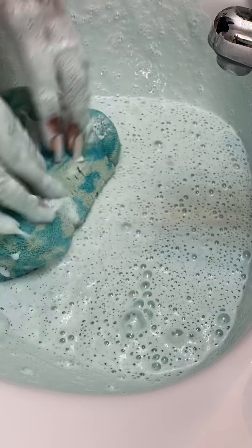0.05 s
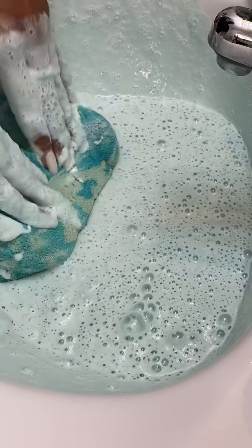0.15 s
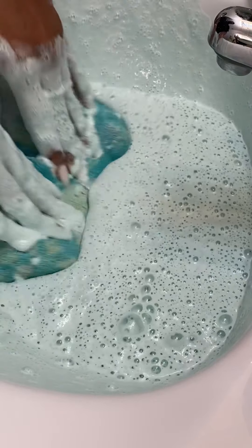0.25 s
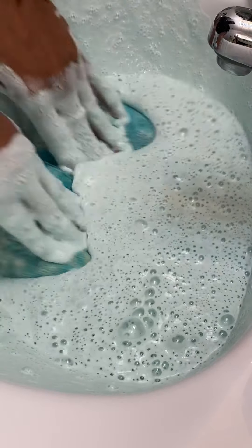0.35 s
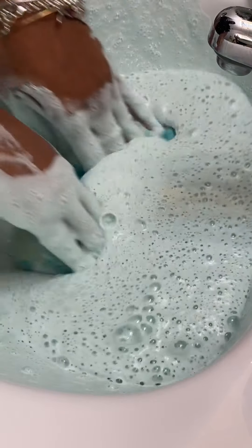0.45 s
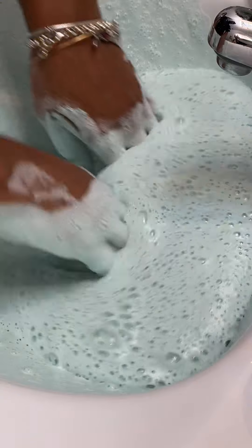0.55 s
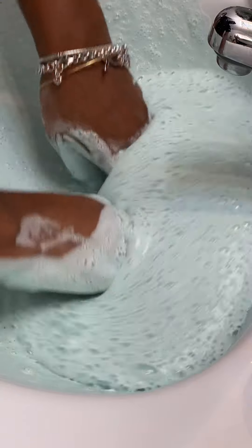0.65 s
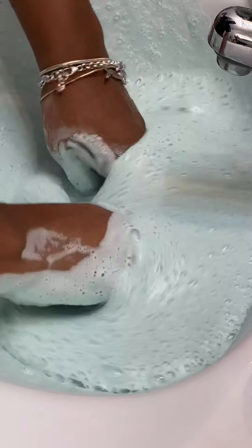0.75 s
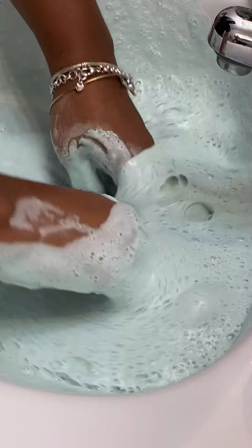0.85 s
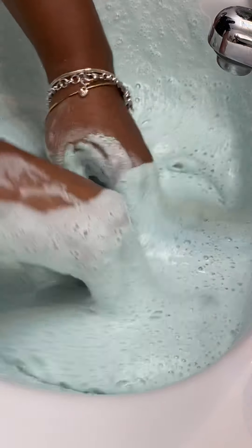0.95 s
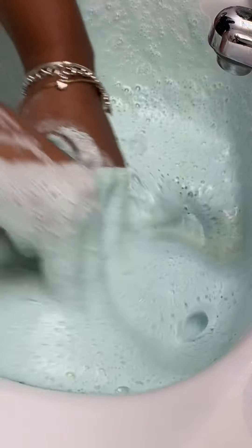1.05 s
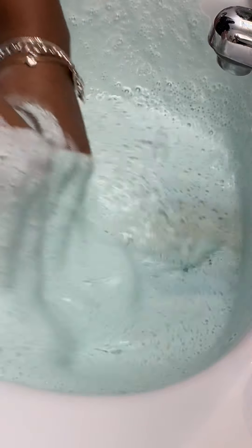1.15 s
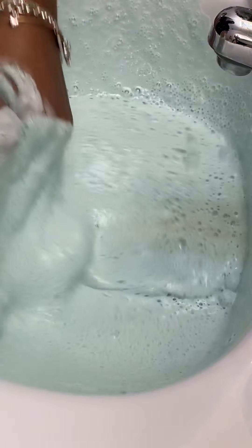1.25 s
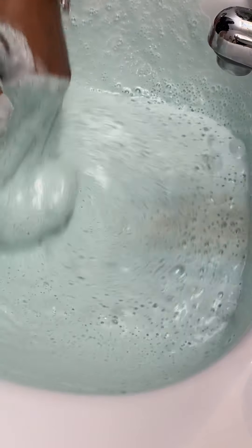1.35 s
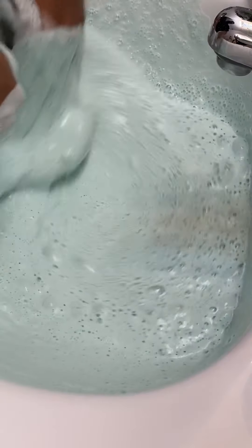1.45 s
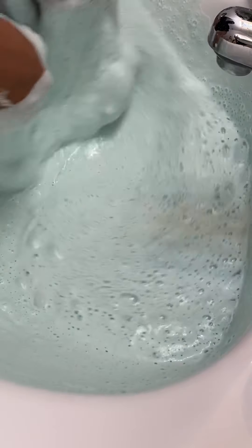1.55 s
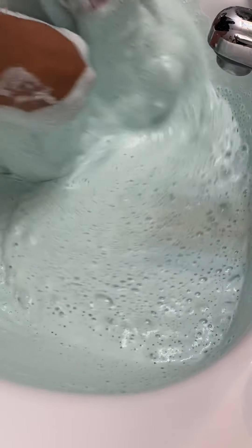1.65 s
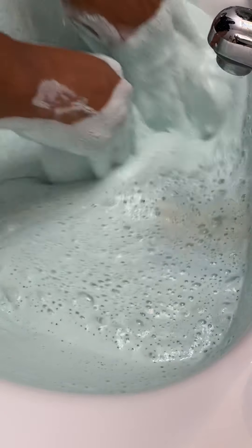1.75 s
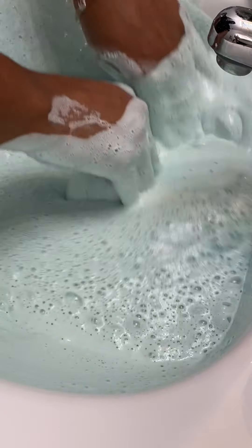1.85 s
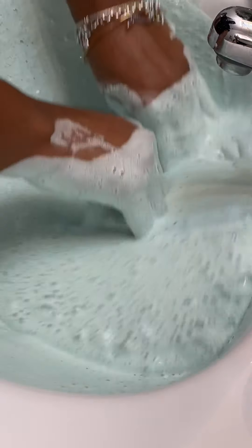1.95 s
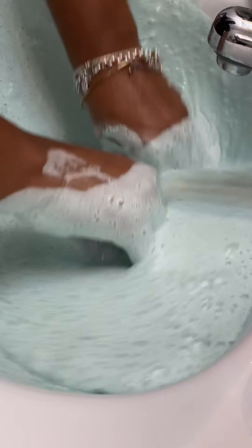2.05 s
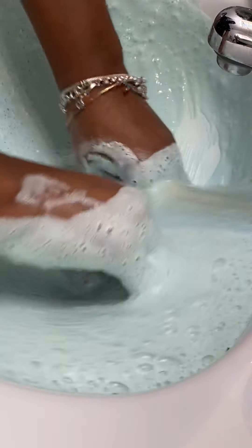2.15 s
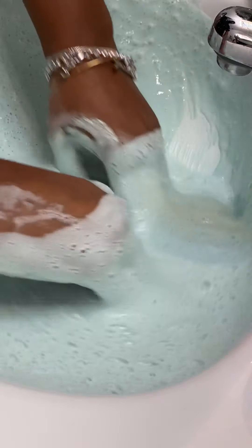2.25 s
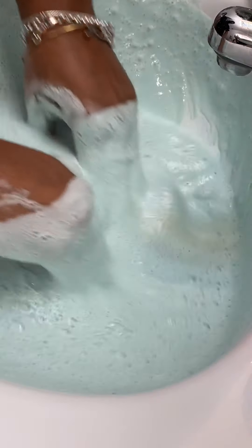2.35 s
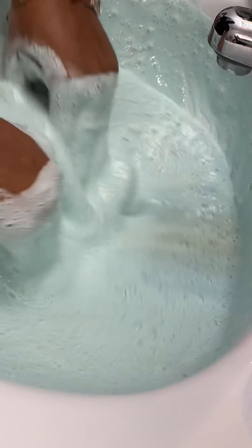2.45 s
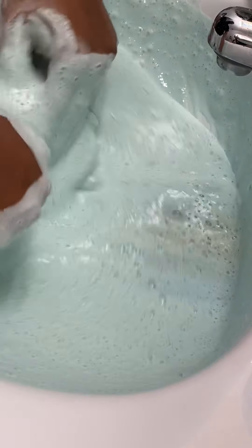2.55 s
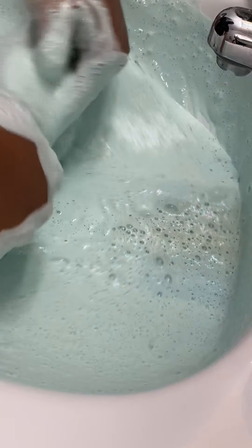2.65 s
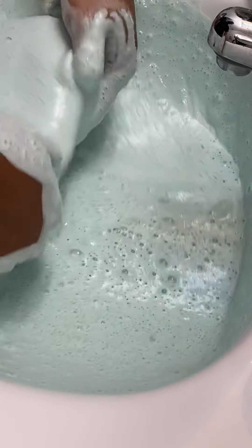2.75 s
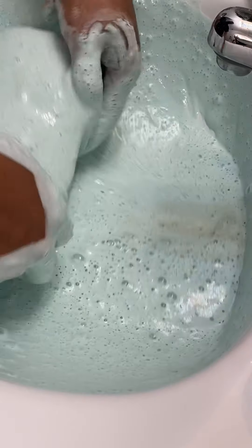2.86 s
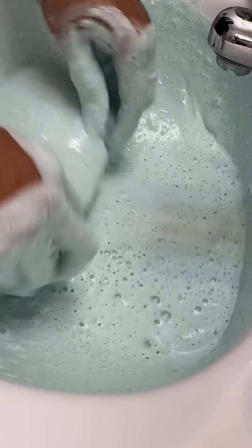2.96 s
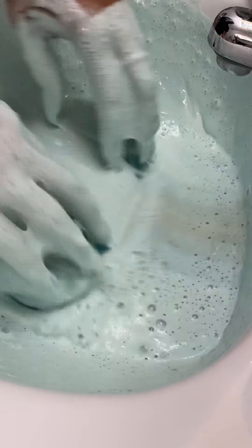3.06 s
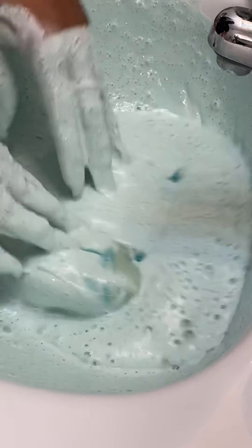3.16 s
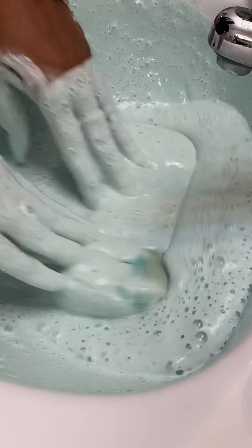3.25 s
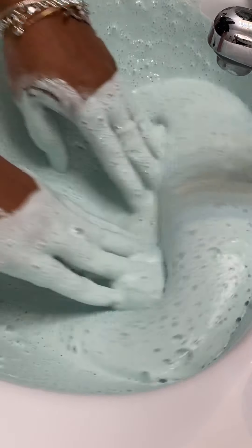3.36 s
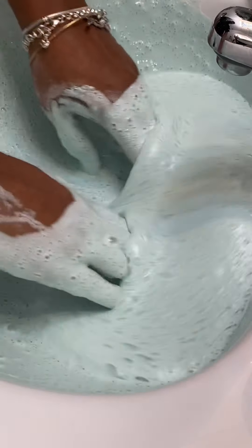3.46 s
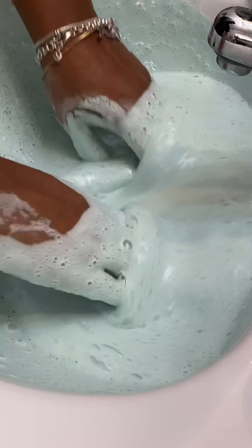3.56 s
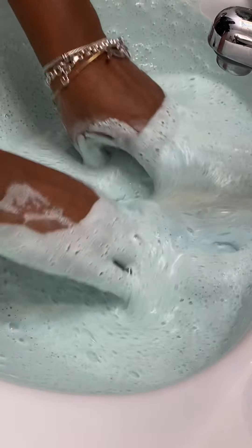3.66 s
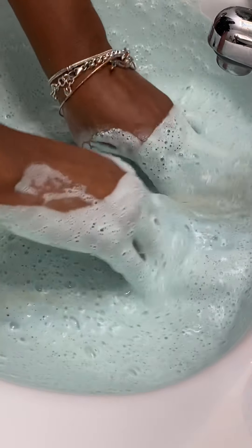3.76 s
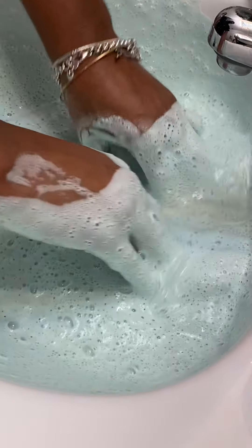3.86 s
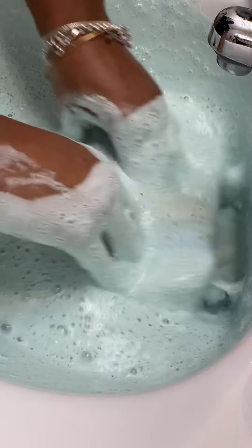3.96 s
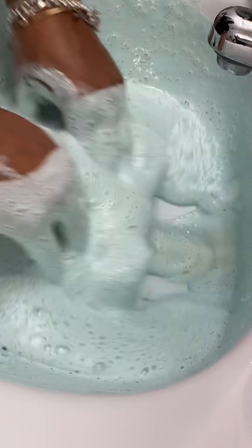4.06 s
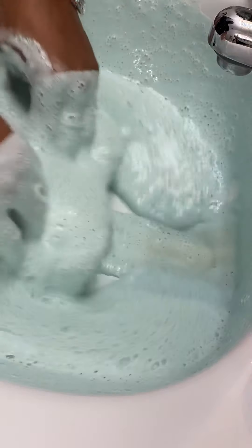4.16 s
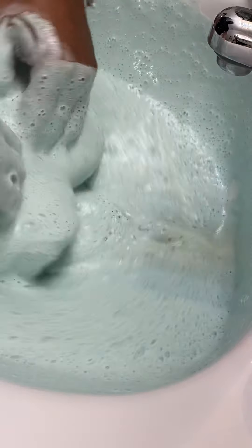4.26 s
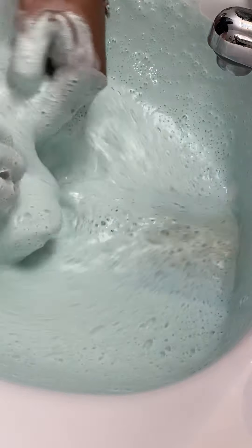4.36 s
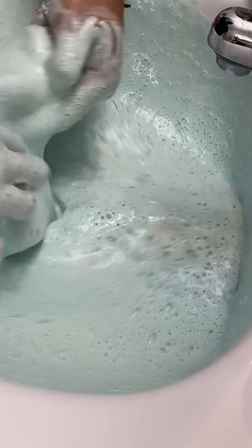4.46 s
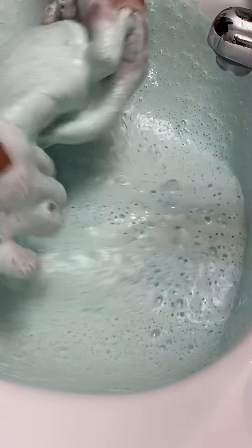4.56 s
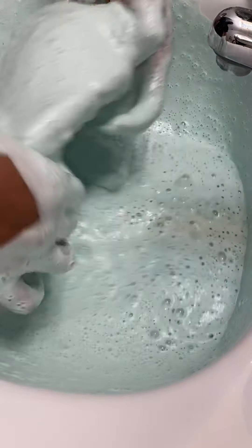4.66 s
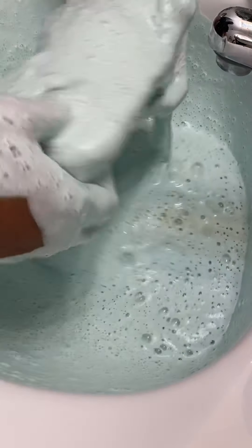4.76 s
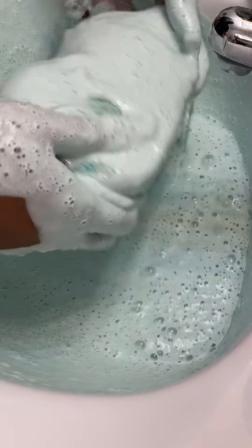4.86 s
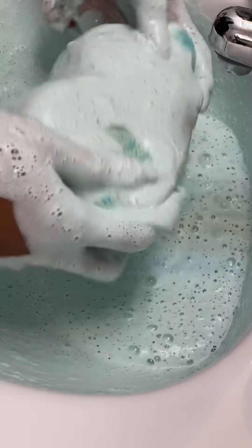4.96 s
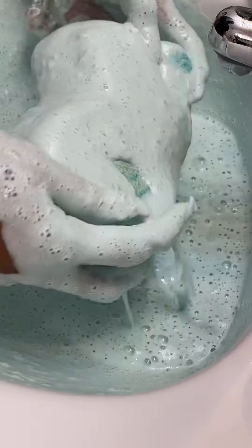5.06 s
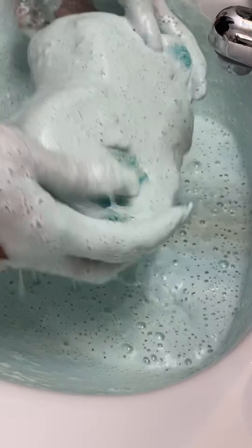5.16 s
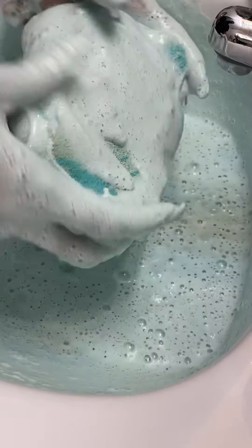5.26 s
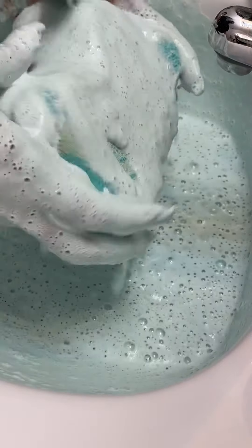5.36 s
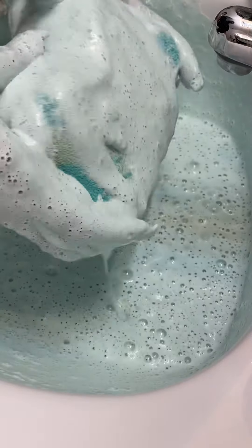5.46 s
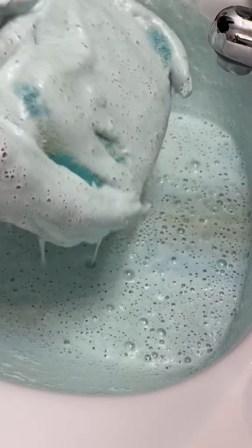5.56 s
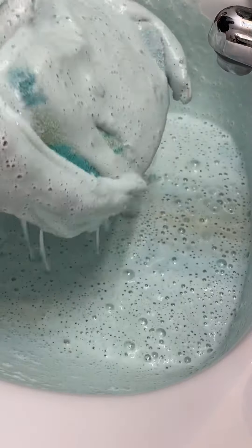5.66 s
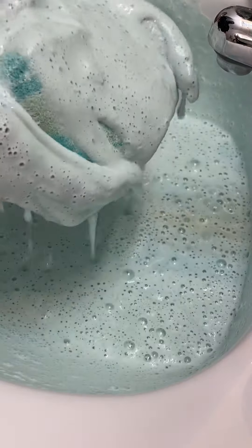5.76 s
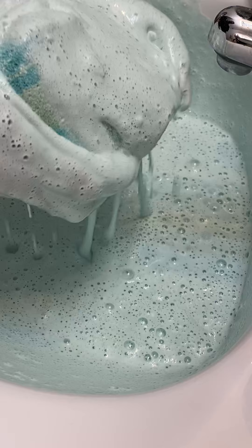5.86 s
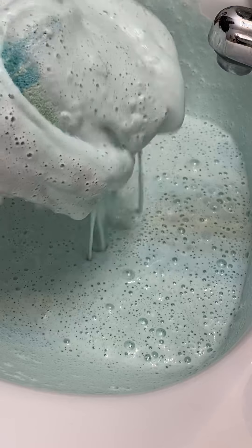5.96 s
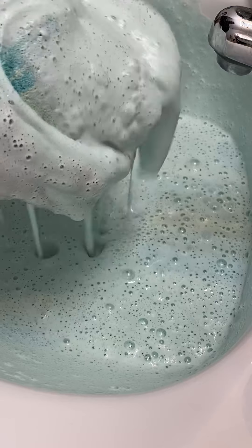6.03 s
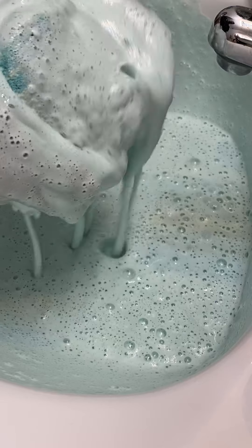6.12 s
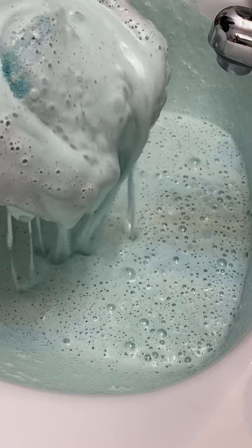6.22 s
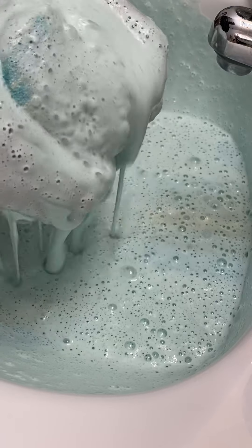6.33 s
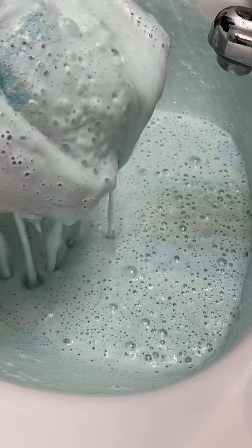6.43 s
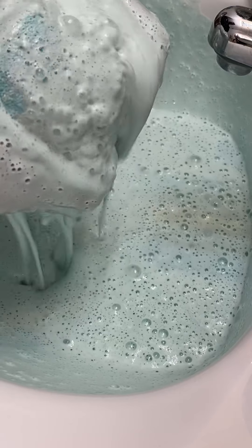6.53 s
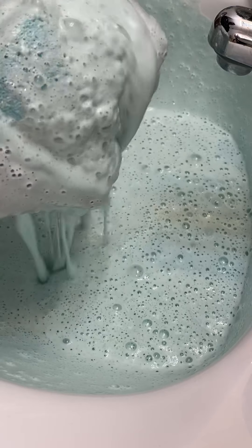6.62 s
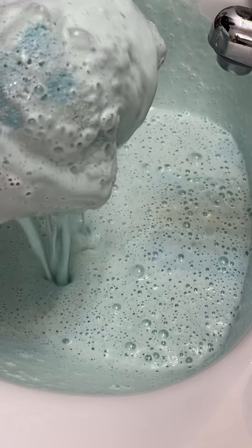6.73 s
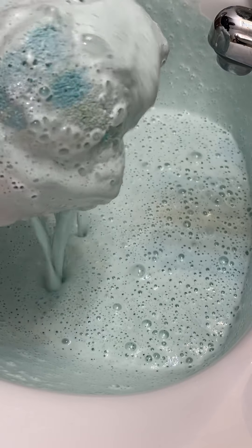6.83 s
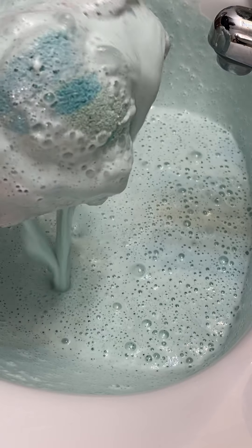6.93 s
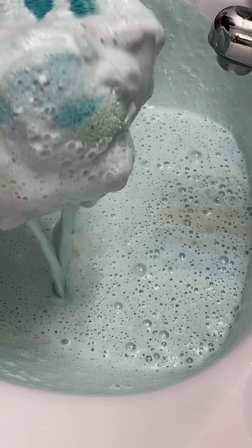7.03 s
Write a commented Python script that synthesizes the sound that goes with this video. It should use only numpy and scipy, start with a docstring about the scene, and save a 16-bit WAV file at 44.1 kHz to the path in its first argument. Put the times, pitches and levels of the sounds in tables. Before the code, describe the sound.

A close, intimate stereo scene in a small bathroom with a short, slightly hollow room response and a faint low hum. From 0 s foam fizzes softly; at about 0.4-0.7 s hands push the sponge with deep sloshes, hollow wet slaps and bubble snaps, while tiny bracelet links tick very high. Another slosh and slap come at 1.0 s, then lighter thumps at 1.3 and 2.0-2.6 s amid quieter swishing. The loudest blow, a heavy wet slap with a sharp bubble pop and squelch, lands at 3.0 s. A rapid bubbling gurgle follows at 3.8-3.95 s, with further squelchy thuds at 4.3-4.5 s. From 4.7 to 5.7 s it calms to thin fizz and sparse pops. From 6 s squeezing brings squishes, low knocks and many crisp bubble pops, densest around 6.4-6.8 s, with bright gritty foam hiss continuing to the end at about 7.1 s.

```python
"""In a small bathroom, hands knead a soapy sponge in a basin of thick foam, then lift it and squeeze it out.
Squeezes swell noise-driven basin modes into sloshes, and bubbles over gargling noise into squelches.
Thuds and a gurgle excite the basin modes with a hollow wet slap; large bubbles snap, ring and spray; foam
fizzes in noise and tiny grains. Bracelet links tick as short high sines over a low hum of filtered noise.
A random-tap reverberation is the room; a close pair of microphone ports hears it all."""
import sys
import numpy as np
from scipy import signal
from scipy.fft import rfft, irfft, next_fast_len
from scipy.io import wavfile
from scipy.ndimage import uniform_filter1d

SR = 44100
rng = np.random.default_rng(int(sys.argv[2]) if len(sys.argv) > 2 else 0)


def store_pcm(level_fs):
    """Save levels as 16-bit WAV."""
    pcm = np.round(np.clip(level_fs, -1, 1) * 32767).astype(np.int16)
    wavfile.write(sys.argv[1], SR, np.atleast_2d(pcm).T)


N = 312669  # length in samples

# The layers that a squeeze drives, in the order of the level columns.
DEEP_SLOSH, UPPER_SLOSH, AIR_SQUELCH, COARSE_FOAM = range(4)

# Levels that remain between squeezes. Columns: deep slosh, upper slosh, squelch, each in dB.
RESTING_DB = [-62.5, -70.5, -76.5]

# Colour of air and water in wet pores. Each row: frequency in Hz, relative filter gain in dB.
PORE_COLOUR = [(250, -14), (500, -5), (780, -2.5), (1250, -3.5), (1550, -12.5), (2500, -18), (6000, -60)]

# Colour of fine foam and spray. Each row: frequency in Hz, relative filter gain in dB.
FINE_COLOUR = [(1500, -11.5), (4000, 1), (6000, 2), (9000, 1.5), (12000, -1.5), (15700, -1.5), (16100, -56)]


def gain_of(db):
    """Amplitude factor of a level in dB."""
    return 10 ** (np.asarray(db) / 20)


def evened(x):
    """Scales a signal to an RMS of one."""
    return x / np.sqrt(np.mean(x ** 2) + 1e-20)


def read(points, hz):
    """Reads a curve of (Hz, value) points along a logarithmic frequency axis."""
    f, value = np.transpose(points)
    return np.interp(np.log(hz + 1), np.log(f + 1), value)


def add(mix, s, sound):
    """Lays a sound into the mix from a moment in seconds, cut off at the end."""
    part = mix[max(round(s * SR), 0):][:len(sound)]
    part += sound[:len(part)]


def coloured(x, spectrum):
    """Filters by a spectrum in dB without delay."""
    size = next_fast_len(x.shape[-1] + 4096)
    gain = gain_of(read(spectrum, np.fft.rfftfreq(size, 1 / SR)))
    return irfft(rfft(x, size) * gain, size)[..., :x.shape[-1]]


def follow(table):
    """The level columns of a table as gains for every sample; the first column is time in seconds."""
    s, *columns = np.transpose(table)
    return [gain_of(np.interp(np.arange(N) / SR, s, db)) for db in columns]


def flicker(ms, db):
    """A gain that wanders at random with a grain length in ms and an RMS depth in dB."""
    wander = uniform_filter1d(rng.standard_normal(N), max(round(ms * SR / 1000), 2))
    return gain_of(db * evened(wander))


def bursts(per_s, spread_db, low_hz, high_hz, cycles, glide, count=24):
    """Dying bubble grains of many pitches, in random clumps, a few large; a positive glide bends them up."""
    chance = per_s / SR * flicker(ms=34, db=4.5)
    size_db = spread_db * np.minimum(rng.exponential(1, N), 4)
    size = gain_of(size_db) * (rng.random(N) < chance)
    kind, out = rng.integers(0, count, N), np.zeros(N)
    for k, hz in enumerate(np.geomspace(low_hz, high_hz, count)):
        turn = np.arange(round(5 * cycles * SR / hz) + 2) * hz / SR  # cycles since the start
        tone = np.sin(2 * np.pi * turn * (1 + glide * turn / cycles))
        grain = tone * np.exp(-turn / cycles) * np.sqrt(hz)
        out += signal.oaconvolve(size * (kind == k), grain)[:N]
    return evened(out)


def squeezed(layer):
    """Gain of one layer from all squeezes: each rises in dB, holds and lets go; their powers add."""
    # Hands squeeze or push the sponge. Each row: start, rise, hold and release in seconds, then the held levels
    # of deep slosh, upper slosh, squelch and coarse foam in dB. Release is scaled by linger, which shortens it.
    squeezes = np.array([(0.0, 0.1, 0.16, 0.2, -59.5, -60.5, -65, -69),
                         (0.282, 0.054, 0.11, 0.18, -49.5, -54.5, -68, -86),
                         (0.411, 0.18, 0.0065, 0.89, -45, -52, -55.5, -61),
                         (0.99, 0.02, 0.011, 0.12, -41, -51.5, -55.5, -63.5),
                         (1.29, 0.074, 0.03, 0.26, -74, -63, -71.5, -78),
                         (1.7, 0.25, 0.16, 0.15, -57, -60, -65, -69),
                         (2.126, 0.054, 0.015, 0.69, -54, -53.5, -59.5, -68),
                         (2.41, 0.17, 0.043, 0.11, -46, -61, -66.5, -92),
                         (2.617, 0.04, 0.16, 0.34, -53.5, -53, -60, -56),
                         (2.964, 0.025, 0.0074, 0.24, -37, -44, -48, -49),
                         (3.387, 0.23, 0.06, 0.11, -45.5, -48, -64.5, -94),
                         (3.647, 0.074, 0.013, 0.082, -49, -68, -61, -74),
                         (3.813, 0.016, 0.053, 0.076, -46, -47, -53.5, -91),
                         (3.876, 0.026, 0.06, 0.22, -43.5, -54, -53.5, -57),
                         (4.255, 0.065, 0.014, 0.41, -46.5, -51.5, -64, -64.5),
                         (4.446, 0.12, 0.04, 0.2, -55.5, -58.5, -69, -60.5),
                         (4.59, 0.04, 0.49, 0.42, -60.5, -65.5, -70, -75),
                         (5.502, 0.5, 1.1, .2, -54, -53.5, -61.5, -55),
                         (6.21, 0.1, 0.076, 0.94, -54, -49, -55, -51),
                         (6.585, 0.07, 0.038, 0.046, -41.5, -45, -51, -60),
                         (6.742, 0.057, 0.042, 0.4, -67, -51, -61, -56),
                         (6.904, 0.13, .1, .2, -50, -51, -79, -48.5)])
    # How slowly a layer lets go. Columns: deep slosh, upper slosh, squelch, coarse foam, as multiples of release.
    linger = [0.78, 0.81, 0.62, 0.25]
    slope_db = 22  # climbed during the rise, lost during the scaled release
    t = np.arange(0, N / SR, 1 / 1000)
    shortest = [[[0]], [[.005]], [[0]], [[.01]]]  # s
    start, rise, hold, release = np.maximum(squeezes[:, :4].T[..., None], shortest)
    since = t - start - rise  # time since the hold began
    climb = np.minimum(since / rise, 0)
    fall = (hold - since) / (release * linger[layer])
    held_db = squeezes[:, 4:][:, layer, None]
    power = (gain_of(held_db + slope_db * np.minimum(climb, fall)) ** 2).sum(0)
    return np.interp(np.arange(N) / SR, t, np.sqrt(power))


def ring(deep):
    """The deep or the upper basin modes after one sharp blow; each takes about a cycle to build."""
    # Modes of the basin. Each row: frequency in Hz, relative level in dB, decay time t60 in seconds.
    basin_modes = [(58.2, 1, 0.12), (91, -11, 0.21), (125, 0, 0.19), (167.3, -4, 0.092), (245, 6.5, 0.073),
                   (335.9, 0, 0.15), (405.5, 3.5, 0.063), (430.8, 0.5, 0.084), (522, -10.5, 0.066),
                   (624, -27, 0.034), (765, -8.5, 0.053), (1000, -38, 0.059)]
    t = np.arange(SR // 2) / SR
    sound = np.zeros(len(t))
    for k, (hz, db, t60) in enumerate(basin_modes):
        if (hz < 200) == deep:
            build = 1 - np.exp(-t * hz / 1.34)
            swing = (-1) ** k * np.sin(2 * np.pi * hz * t)  # neighbours swing opposite
            sound += gain_of(db - 60 * t / t60) * build * swing
    return sound / abs(sound).max()


def slosh():
    """Lumpy pushes of foam on the wall keep the basin ringing."""
    push = rng.standard_normal(N) * flicker(ms=22, db=1.5)
    deep = evened(signal.oaconvolve(push, ring(deep=True))[:N])
    upper = evened(signal.oaconvolve(push, ring(deep=False))[:N])
    deep_gain = np.hypot(squeezed(DEEP_SLOSH), gain_of(RESTING_DB[DEEP_SLOSH]))
    upper_gain = np.hypot(squeezed(UPPER_SLOSH), gain_of(RESTING_DB[UPPER_SLOSH]))
    return deep_gain * deep + upper_gain * upper


def squelch():
    """Air forced through wet pores: low bubbles over a gargling rush."""
    rush = rng.standard_normal(N) * flicker(ms=7.6, db=2)
    bubbles = bursts(900, 4.65, 429, 1910, cycles=4.1, glide=0.056)
    pores = 0.89 * evened(rush) + 0.47 * bubbles
    gain = np.hypot(squeezed(AIR_SQUELCH), gain_of(RESTING_DB[AIR_SQUELCH]))
    return gain * evened(coloured(pores, PORE_COLOUR))


def thuds_and_gurgle():
    """Each event rings the basin; the air pocket under the foam gives a hollow wet slap."""
    # Blows on the basin; the close cluster from 3.82 to 3.91 s is a gurgle. Each row: start in seconds, level
    # of the deep modes in dB, of the upper modes in dB, of the slap in dB, slap pitch in Hz.
    events = [(0.05, -40, -52, -51, 1280), (0.374, -29, -35, -39, 800), (0.496, -40.5, -53, -76, 732),
              (0.551, -71, -39.5, -41.5, 730), (0.651, -48, -46, -35, 756), (0.664, -32, -44, -40, 800),
              (0.708, -30, -35.5, -56, 774), (0.994, -32, -50, -31, 720), (1.342, -28, -38, -50.5, 760),
              (1.62, -65, -50, -53, 885), (1.98, -35, -42.5, -42, 700), (2.135, -66, -51, -41, 776),
              (2.219, -33, -42, -44, 1190), (2.521, -59, -44.5, -61, 610), (2.566, -35, -62, -67, 600),
              (2.985, -13.5, -22, -29.5, 820), (3.009, -28, -39, -38, 940), (3.238, -39.5, -43.5, -57, 736),
              (3.456, -38, -42, -98, 560), (3.592, -36, -37, -60, 570), (3.821, -45, -33.5, -44.5, 1050),
              (3.842, -33, -42, -40, 1090), (3.866, -33, -52, -37, 1100), (3.885, -30.5, -33, -35, 870),
              (3.913, -30, -34.5, -34, 564), (4.319, -33, -34, -39.5, 955),
              (4.48, -31.5, -36.5, -43.5, 710), (4.542, -45, -44, -52, 760), (6.047, -38.5, -87, -55, 696),
              (6.167, -27, -30, -41, 750), (6.284, -36.5, -35.5, -39.5, 1240),
              (6.375, -35, -34.5, -46, 1140), (6.617, -55, -33, -40.5, 760), (6.761, -52, -34.5, -39, 1190)]
    out, deep, upper = np.zeros(N), ring(deep=True), ring(deep=False)
    t = np.arange(1800) / SR
    touch = (1 - np.exp(-t / 0.001)) * np.hanning(2 * len(t))[len(t):]  # foam cushions the contact
    noises = rng.standard_normal((len(events), len(t)))
    for (s, deep_db, upper_db, slap_db, hz), noise in zip(events, noises):
        add(out, s, gain_of(deep_db) * deep + gain_of(upper_db) * upper)
        pocket = np.sin(2 * np.pi * hz * t) * gain_of(-60 * t / 0.025)
        splash = 0.48 * evened(coloured(noise, PORE_COLOUR)) * gain_of(-60 * t / 0.051)
        add(out, s, gain_of(slap_db) * (pocket + splash) * touch)
    return out


def pops():
    """A large bubble bursts in a broad symmetric snap; its air rings a few cycles and a faint spray follows."""
    # Large bubbles burst. Each row: moment in seconds, body level in dB, pitch in Hz, top-end tick level in dB.
    large_bubbles = [(0.097, -50.5, 1880, -75), (0.3737, -38, 2620, -52), (0.381, -38, 1910, -65),
                     (0.496, -49, 2900, -60), (0.633, -44, 1870, -76), (0.6518, -39, 2050, -78),
                     (0.686, -44, 2200, -72), (0.994, -42, 4990, -71), (1.022, -46, 3740, -72),
                     (1.044, -56, 4300, -72), (1.099, -48.5, 4400, -68), (1.0664, -53.5, 2850, -66),
                     (1.135, -51.5, 3480, -55), (1.5225, -44, 1900, -80), (1.62, -49.5, 1900, -71),
                     (1.797, -52, 1710, -77), (1.938, -47, 5100, -66), (2.093, -54, 1730, -65),
                     (2.107, -47, 2030, -75), (2.226, -45, 2800, -55), (2.693, -56, 1270, -47),
                     (2.748, -42, 1310, -60), (2.787, -61, 1780, -49), (2.9126, -57, 4900, -46),
                     (2.9841, -27.5, 1780, -56), (2.998, -41, 1910, -38.5), (3.0133, -34, 1800, -45),
                     (3.1026, -45, 2280, -58), (3.1286, -44, 1890, -56), (3.1492, -48, 1890, -57),
                     (3.2924, -55, 1500, -75), (3.3277, -54, 1500, -80), (3.36, -54, 1870, -79),
                     (3.371, -52, 1560, -80), (3.399, -51, 2740, -72), (3.416, -53, 2620, -72),
                     (3.592, -53.5, 3100, -72), (3.712, -47, 3060, -72), (3.723, -49.5, 1700, -54),
                     (3.889, -49, 2800, -51), (3.943, -39.5, 3530, -53), (3.954, -39.5, 2950, -65),
                     (3.9752, -44, 2650, -59), (4.047, -47, 1490, -68), (4.083, -46.5, 1070, -61),
                     (4.112, -72, 2300, -51), (4.238, -45, 2170, -82), (4.3201, -41.5, 2240, -68),
                     (4.4817, -41.5, 1480, -73), (4.543, -37.5, 2250, -41), (4.673, -48, 2900, -66),
                     (4.781, -43, 1230, -75), (4.8223, -46.5, 2790, -76), (5.078, -46, 3850, -75),
                     (5.9979, -39.5, 2330, -42.5), (6.105, -36, 2900, -41), (6.168, -43, 2650, -42.5),
                     (6.2895, -37, 2200, -45), (6.3024, -37, 2700, -48), (6.363, -41, 4000, -60),
                     (6.3773, -33, 1980, -44), (6.402, -39, 4300, -53), (6.426, -36, 1080, -58),
                     (6.515, -46, 4200, -65), (6.47, -36, 2140, -39.5), (6.62, -35.5, 2110, -68),
                     (6.68, -40, 3140, -62), (6.764, -32.5, 3320, -41), (6.7675, -33, 2310, -39),
                     (6.807, -34, 2310, -44), (7.051, -36.5, 2070, -48), (7.0715, -44, 2194, -49)]
    out, t = np.zeros(N), np.arange(1400) / SR
    lead = .002  # s before the peak of the snap
    swell = np.exp(-abs(t - lead) / 0.00085)  # noise swells and dies evenly around the peak
    after = np.maximum(t - lead, 0)
    spray = swell + .14 * (t > lead) * gain_of(-60 * after / .07)
    noises = rng.standard_normal((len(large_bubbles), 2, len(t)))
    for (s, db, hz, tick_db), noise in zip(large_bubbles, noises):
        bubble = 0.43 * np.sin(2 * np.pi * hz * after) * np.exp(-after / 0.0035)
        around = [(hz / 15.0, -16), (hz, 0), (hz * 2.15, -11), (hz * 6, -40)]  # (Hz, dB)
        snap = coloured(signal.unit_impulse(len(t), round(lead * SR)), around)
        wet_noise = spray * evened(coloured(noise[0], around))
        body = bubble + 0.96 * snap / snap.max() + 0.5 * wet_noise
        tick = spray * evened(coloured(noise[1], FINE_COLOUR))
        add(out, s - .0012, gain_of(db) * body + gain_of(tick_db) * tick)
    return out


def fizz():
    """Countless bubbles burst: a gritty rush of coarse ones, a hiss of fine ones, sharp crackles through both."""
    # Foam fizz beyond the squeeze rows; the burst near 6.8 s belongs to a squeeze.
    # Each row: time in seconds, coarse foam in dB, fine foam in dB.
    further_foam = [(0, -72.5, -73), (.06, -65.5, -62.5), (.33, -60.5, -58), (.66, -62, -71.5),
                    (.95, -67, -68.5), (1.4, -74.5, -62), (1.75, -69.5, -74), (1.9, -69, -64.5),
                    (2.46, -72.5, -76), (2.62, -75, -71.5), (2.94, -63.5, -59), (3.14, -72, -68.5),
                    (3.22, -72.5, -75.5), (3.4, -74, -72), (3.55, -90, -77), (3.72, -67, -70),
                    (3.8, -85, -83), (3.87, -96, -96), (3.95, -64, -69), (4.62, -74, -67.5),
                    (4.72, -64, -66.5), (5.2, -71.5, -64.5), (5.42, -76.5, -79.5), (5.6, -77, -63),
                    (6.7, -50, -69), (6.8, -53.5, -48.5), (6.95, -60, -55), (7.09, -59, -48)]
    # Colour of coarse foam. Each row: frequency in Hz, relative filter gain in dB.
    coarse_colour = [(600, -16), (1200, 1.5), (1720, -5), (1880, 0), (2160, -1), (2340, -4.5), (2750, -3),
                     (3500, -8.5), (5000, -12.5), (8000, -18), (14000, -26)]
    fine_under_coarse_db = 5.5  # for foam driven by the squeeze rows
    swell = flicker(ms=33, db=1.5)
    crackle = bursts(320, 0.85, 2100, 20000, cycles=0.66, glide=0)
    blips = bursts(1100, 3.3, 1640, 6500, cycles=14.0, glide=.012)
    grit = swell * rng.standard_normal(N) * flicker(ms=2.5, db=2.5)
    coarse = grit + 0.3 * crackle + 0.5 * blips
    hiss = swell * rng.standard_normal(N) * flicker(ms=59, db=3.5)
    pings = bursts(250, 8.8, 4000, 15000, cycles=37.0, glide=0)
    fine = hiss + 0.6 * crackle + 0.21 * pings
    pressed = squeezed(COARSE_FOAM)
    further_coarse, further_fine = follow(further_foam)
    coarse_gain = np.hypot(pressed, further_coarse)
    fine_gain = np.hypot(pressed / gain_of(fine_under_coarse_db), further_fine)
    return (coarse_gain * evened(coloured(coarse, coarse_colour))
            + fine_gain * evened(coloured(fine, FINE_COLOUR)))


def bracelet():
    """Tiny links tick together and ring briefly at the top of hearing."""
    # Each row: start in seconds, level in dB.
    link_ticks = [(0.607, -49), (0.7682, -50), (0.836, -55), (3.2755, -56), (4.2906, -56), (5.5228, -54),
                  (6.4717, -53)]
    # Modes of a link. Each row: frequency in Hz, relative level in dB, decay time t60 in seconds.
    link_modes = [(14400, -4, .015), (15550, -8, 0.037), (15100, -3, .06)]
    out, t = np.zeros(N), np.arange(2000) / SR
    tick = sum(np.sin(2 * np.pi * hz * t) * gain_of(db - 60 * t / t60) for hz, db, t60 in link_modes)
    for s, db in link_ticks:
        add(out, s, gain_of(db) * tick)
    return out


def hum():
    """Low steady noise of the house: white noise shaped into broad low peaks."""
    # Each row: frequency in Hz, relative filter gain in dB.
    hum_colour = [(20, -21), (40, 0), (52, -11.5), (63, 10), (75, 4), (100, -29), (120, 7.5), (140, -27),
                  (250, -15), (420, -22.5), (520, -18), (900, -49.5)]
    level_db = -54.5  # RMS, ahead of room and microphone
    return gain_of(level_db) * evened(coloured(rng.standard_normal(N), hum_colour))


def bathroom(x):
    """Sparse taps of random sign, other ones for each side, each band dying at its own speed."""
    # Each row: frequency in Hz, decay time t60 in seconds.
    room_decay = [(100, 0.028), (700, 0.32), (3000, 0.037), (12000, 0.014)]
    # How much the room answers. Each row: frequency in Hz, gain in dB.
    room_share = [(100, -32), (400, -13.5), (540, -1.5), (750, -2.5), (1300, -11), (2500, -12),
                  (6000, -23.5), (15000, -19)]
    taps = np.zeros((2, SR // 2))
    at = np.arange(100, SR // 2 - 20, 20)
    at = at + rng.integers(0, 20, (2, len(at)))  # one tap somewhere in every 20 samples
    np.put_along_axis(taps, at, rng.choice([-1., 1.], at.shape), 1)
    hz, t, bands = signal.stft(taps, SR, nperseg=256)
    bands = bands * gain_of(-60 * t / read(room_decay, hz)[:, None])
    bands = bands / np.linalg.norm(bands, axis=2, keepdims=True)  # equal energy in every band
    tail = signal.istft(bands, SR, nperseg=256)[1]
    tail = tail / np.linalg.norm(tail[0])
    return coloured(signal.fftconvolve(x[None], tail, axes=1)[:, :N], room_share)


def scene():
    """All sources close by, plus the answer of the room on both sides."""
    near = slosh() + squelch() + fizz() + thuds_and_gurgle() + pops() + bracelet() + hum()
    return near + bathroom(near)


def record(dry):
    """Left leads right by a phase growing through the treble, which widens the stereo; bass and top are cut."""
    # Each row: frequency in Hz, phase by which left leads right in radians.
    stereo_phase = [(0, 0), (400, -.12), (850, -.5), (2400, .2), (5100, .1), (7000, 3), (8000, 3.5),
                    (10000, 6.1), (11400, 6.6), (13200, 9.3), (14300, 9.6), (17000, 13.6)]
    size = next_fast_len(N + 4096)
    lead = np.interp(np.fft.rfftfreq(size, 1 / SR), *np.transpose(stereo_phase))
    turn = np.exp(.5j * np.array([lead, -lead]))  # half of the lead on each side
    heard = irfft(rfft(dry, size) * turn, size)[:, :N]
    heard = signal.sosfilt(signal.butter(3, 58., "high", fs=SR, output="sos"), heard)
    band_limit = signal.firwin(511, 16200, window=("kaiser", 9), fs=SR)  # low-pass, Hz
    return signal.oaconvolve(heard, band_limit[None], "same")


dry = scene()
out = record(dry)
store_pcm(out)
```